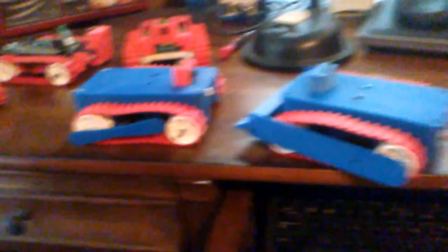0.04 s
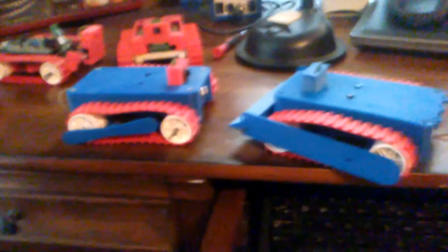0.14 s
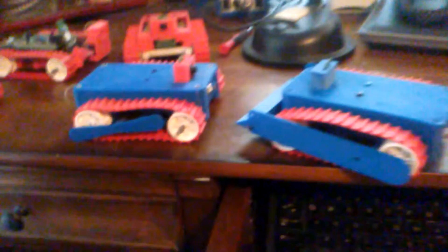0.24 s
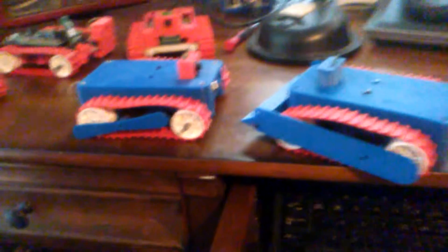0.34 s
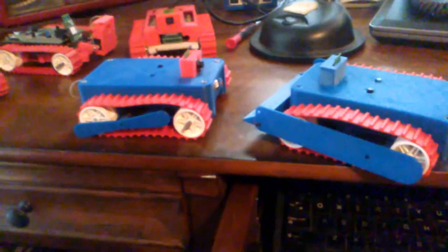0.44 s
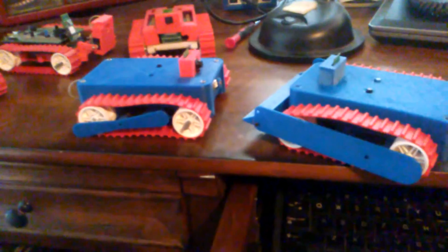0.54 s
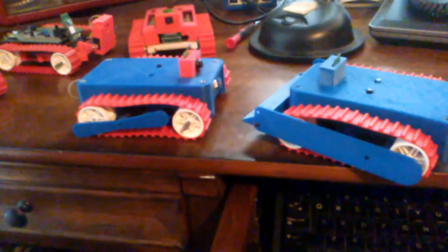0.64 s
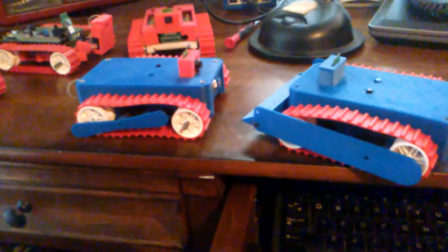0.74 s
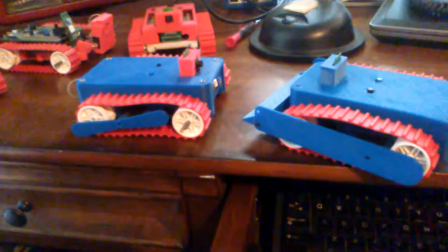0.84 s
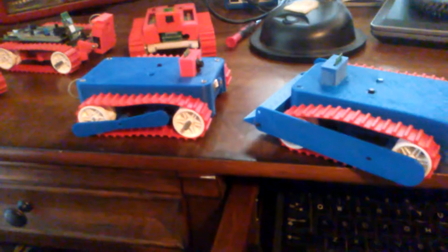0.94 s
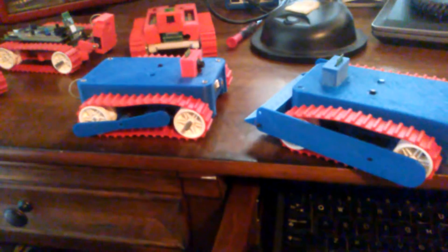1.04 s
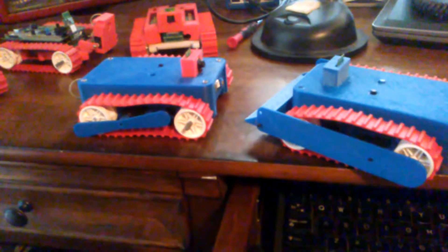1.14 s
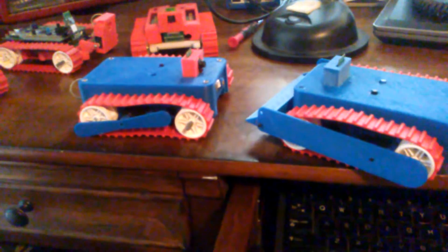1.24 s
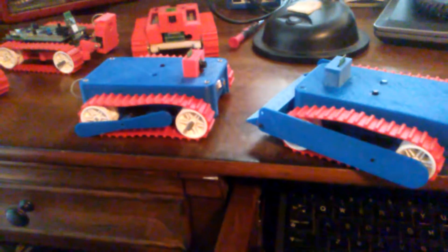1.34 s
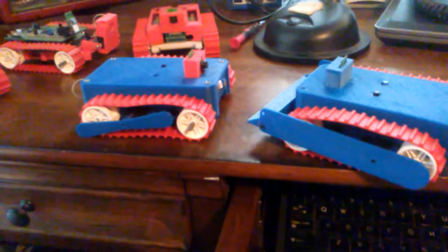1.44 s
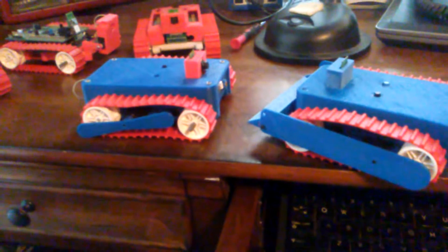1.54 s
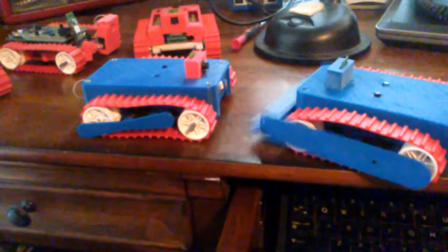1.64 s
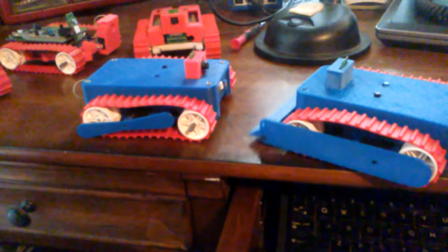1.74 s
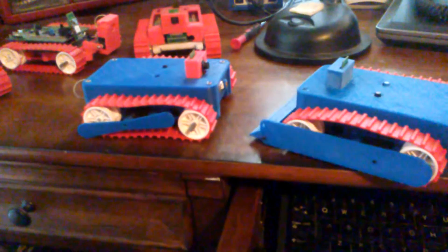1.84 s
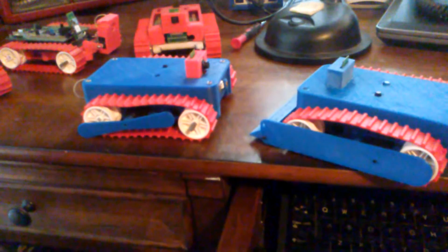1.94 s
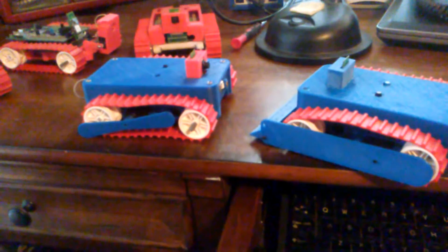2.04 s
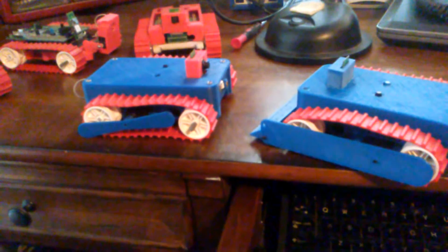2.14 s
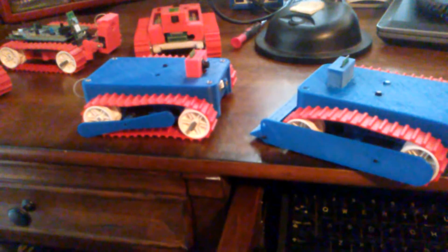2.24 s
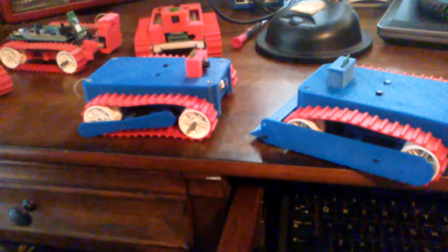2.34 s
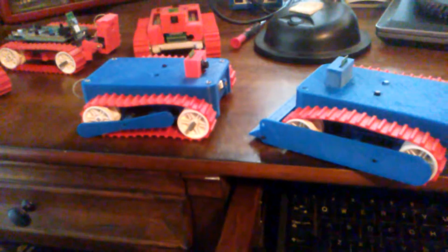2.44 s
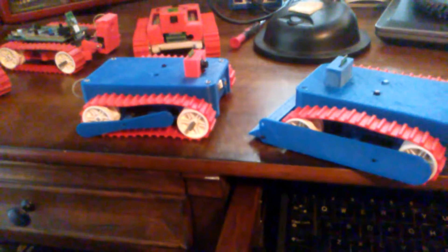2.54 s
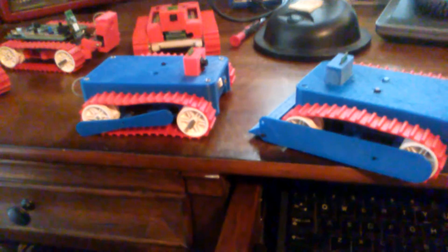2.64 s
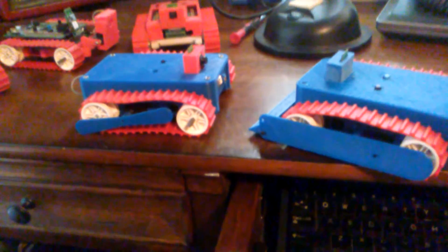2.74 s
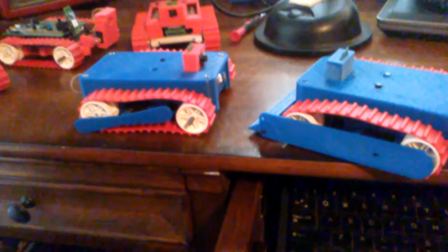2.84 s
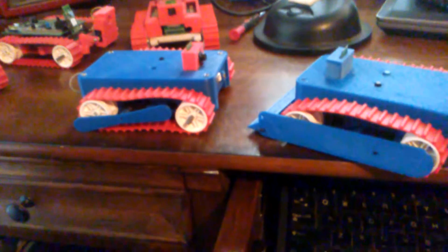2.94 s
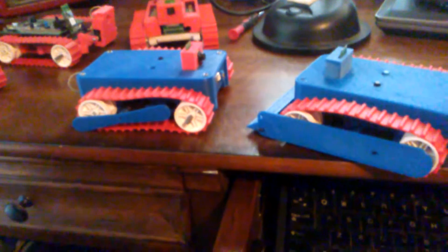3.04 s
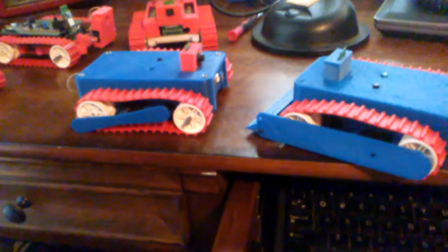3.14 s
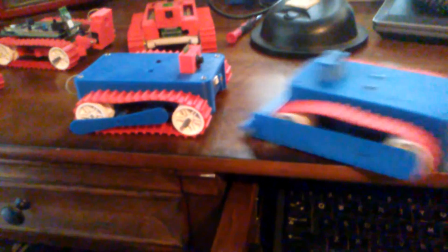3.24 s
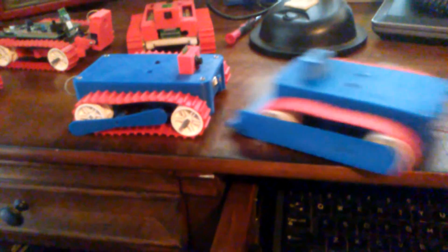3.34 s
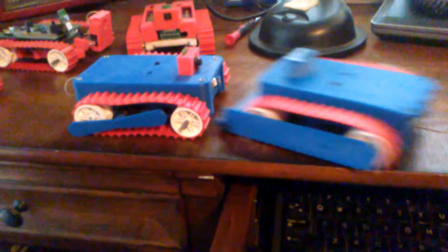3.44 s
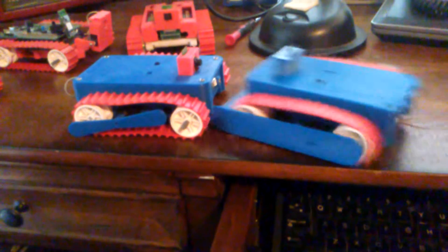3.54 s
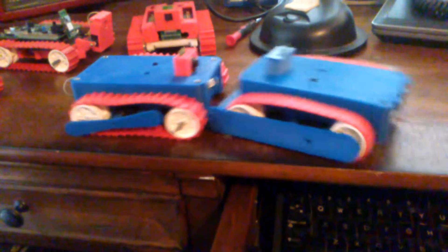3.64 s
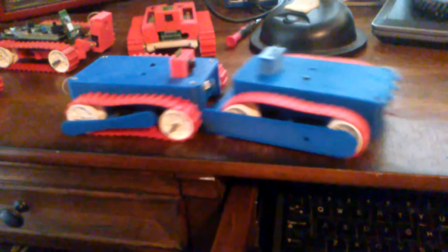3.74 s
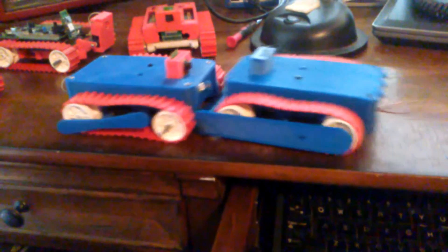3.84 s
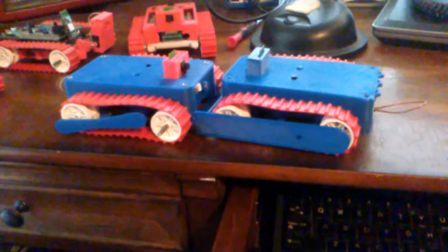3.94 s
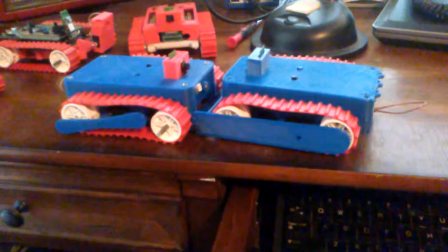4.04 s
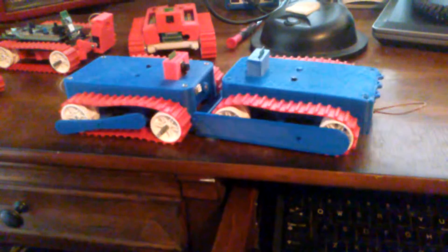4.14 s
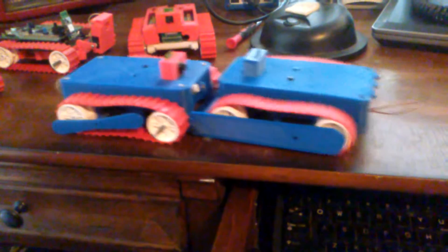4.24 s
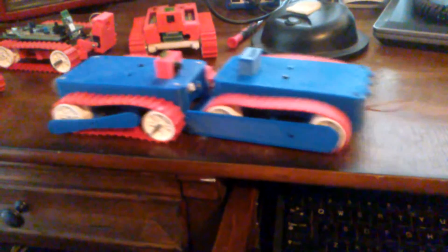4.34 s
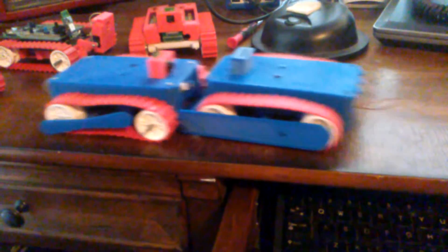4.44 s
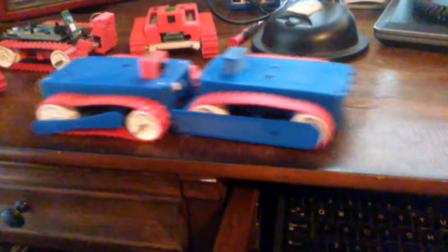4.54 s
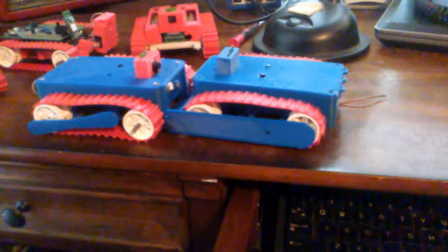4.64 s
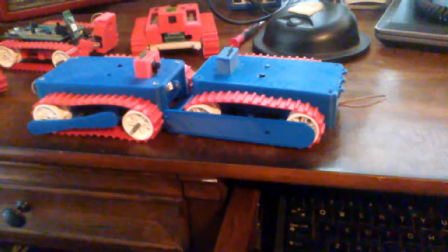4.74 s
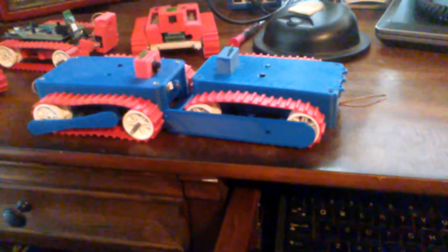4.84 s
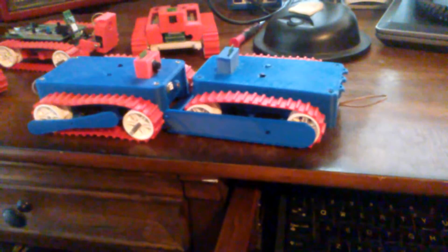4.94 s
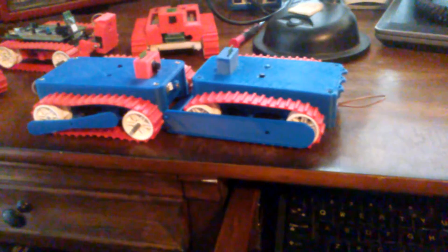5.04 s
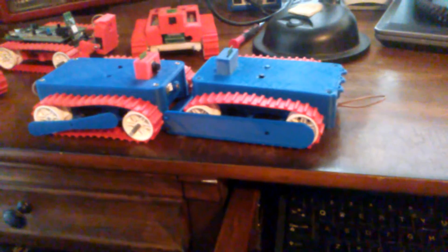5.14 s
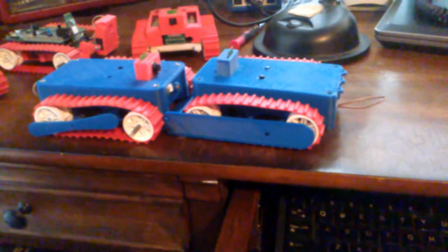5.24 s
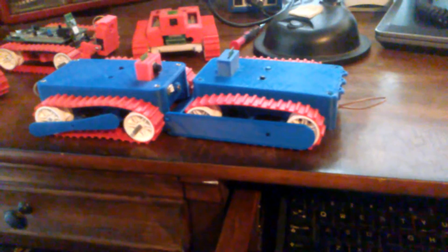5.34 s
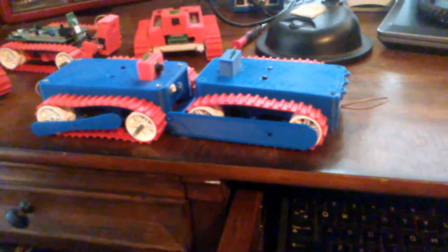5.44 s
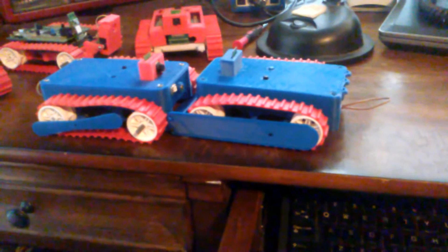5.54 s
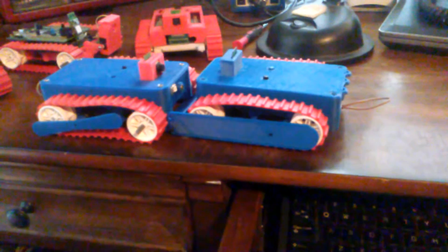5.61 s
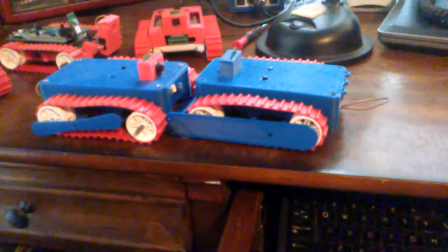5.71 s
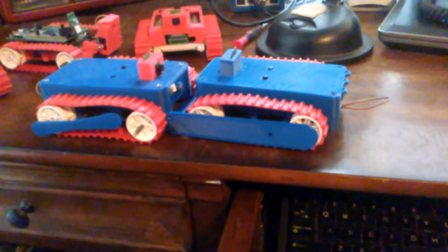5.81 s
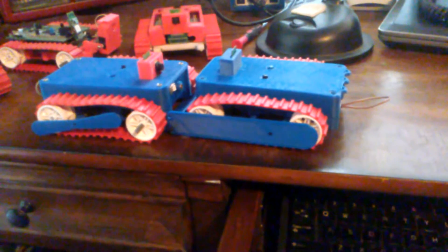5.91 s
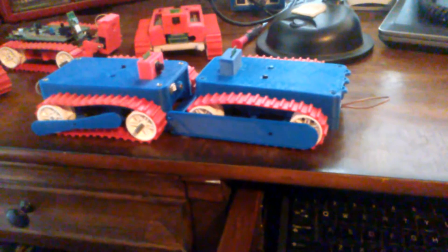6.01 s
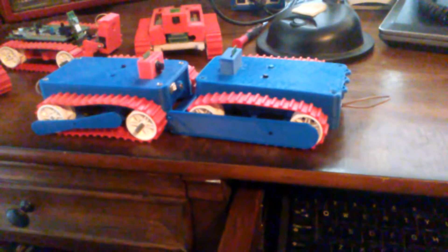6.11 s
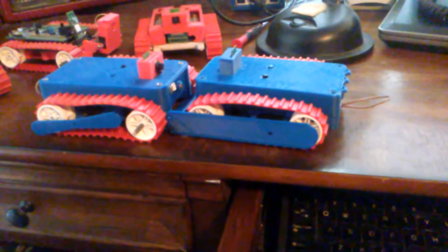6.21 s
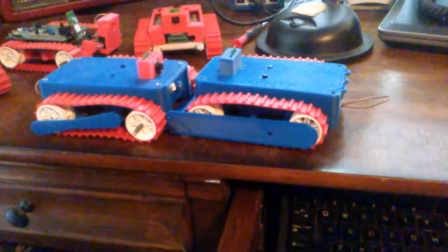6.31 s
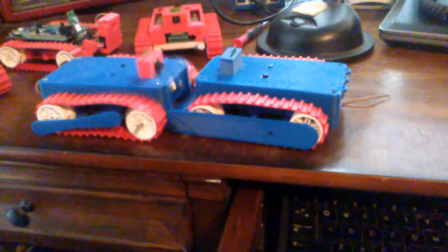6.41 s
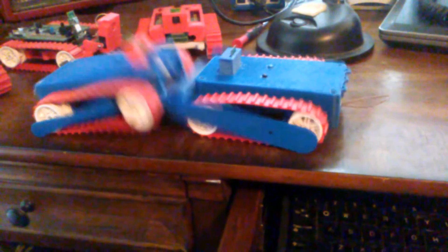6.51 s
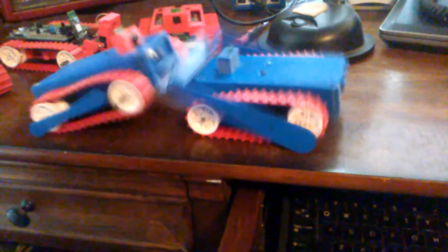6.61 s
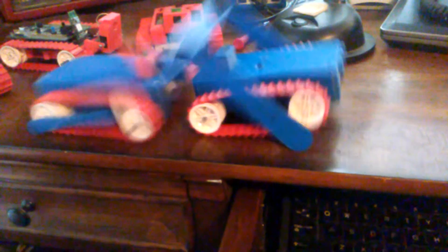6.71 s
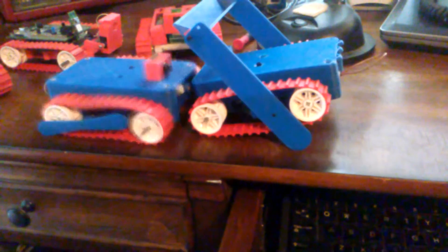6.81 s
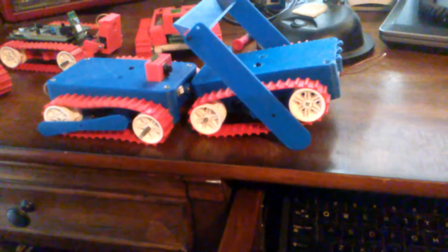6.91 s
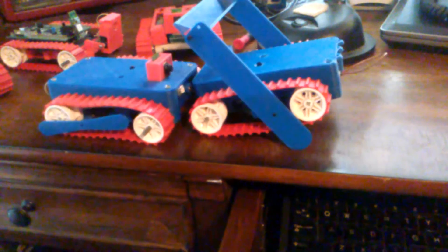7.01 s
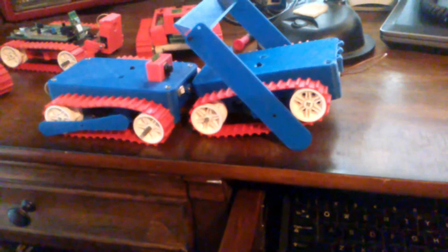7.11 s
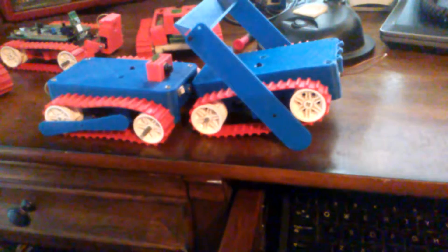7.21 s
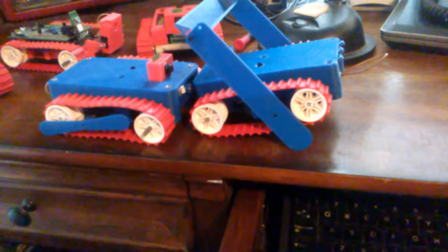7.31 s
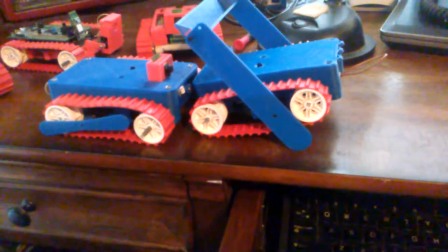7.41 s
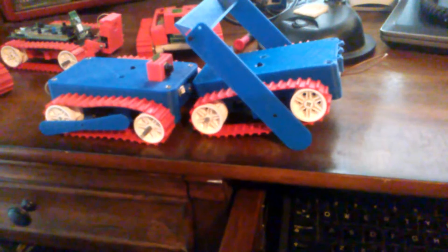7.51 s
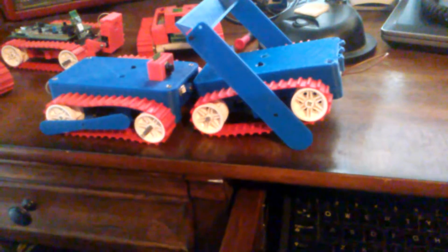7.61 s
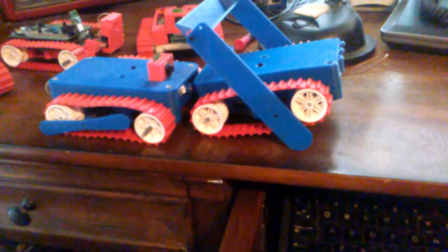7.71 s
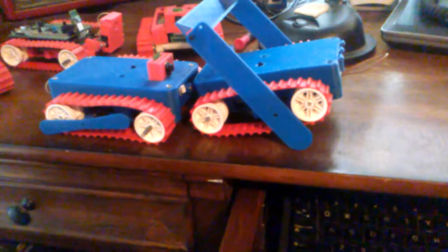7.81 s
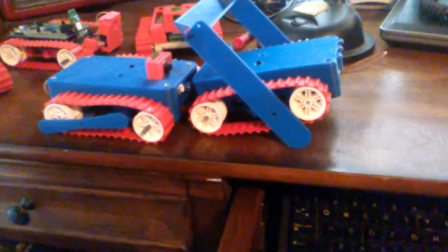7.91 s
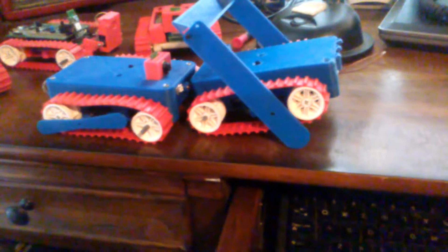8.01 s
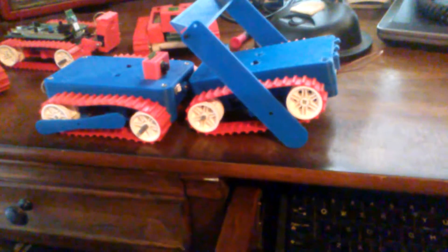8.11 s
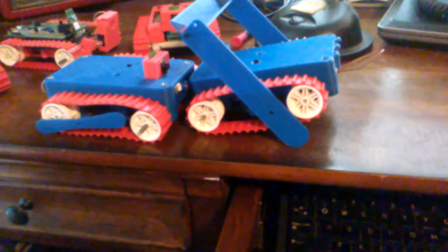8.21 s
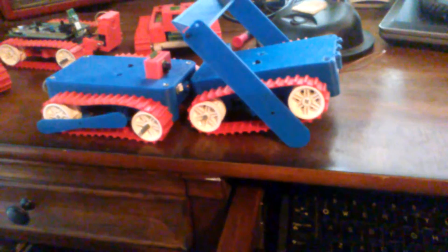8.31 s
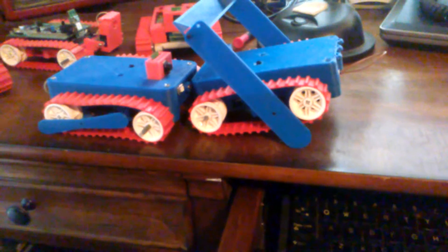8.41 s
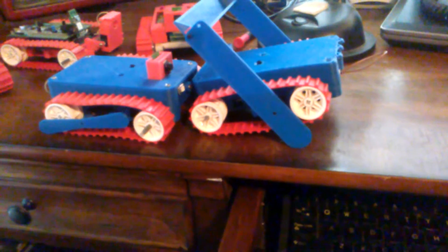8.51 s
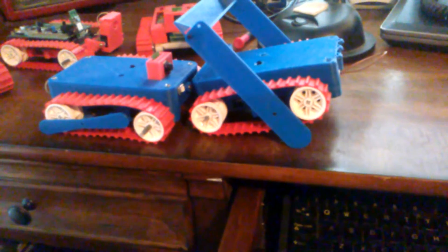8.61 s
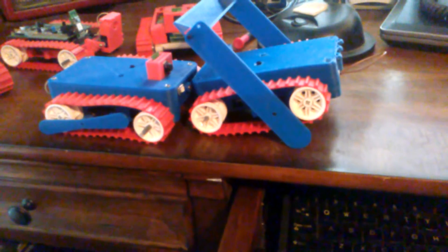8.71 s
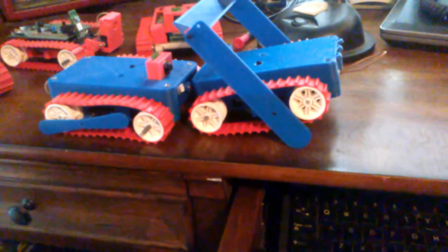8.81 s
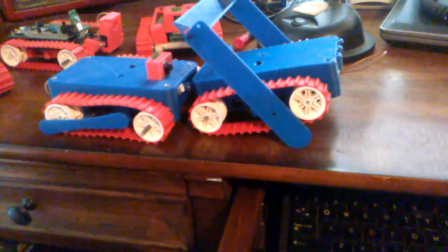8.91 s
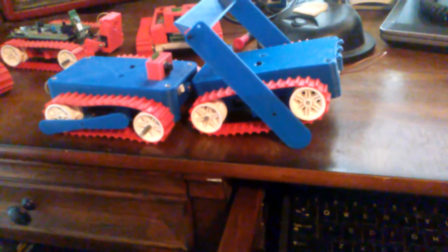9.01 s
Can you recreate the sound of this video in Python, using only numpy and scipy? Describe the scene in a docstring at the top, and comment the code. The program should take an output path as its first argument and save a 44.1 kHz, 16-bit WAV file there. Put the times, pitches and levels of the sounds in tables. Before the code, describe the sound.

Close view of two plastic tracked robots on a wooden desk in a small room, a computer fan humming softly. Mouse clicks and tiny servo ticks come first. One robot drives in two short, rattling, whining bursts, nudging the other. A faint servo buzz follows, then a sharp gear whirr flips up an arm, hulls clatter, the desk booms, and a thin buzz continues to the end.

```python
"""Small room, wooden desk: two tracked toy robots, steered by clicks of a computer mouse.
One drives forward in two bursts: shaft tones, tooth impacts and a mesh tone make its gear motors whine.
Its servo lifts an arm (whirring gears) and tips the other robot, which drops back: noise bursts, desk modes.
A stalled servo buzzes as control frames kick its gears; shaped noise and wavering tones are a computer's fan."""
import sys
import numpy as np
from scipy import signal
from scipy.fft import rfft, irfft
from scipy.io import wavfile

SR = 44100
rng = np.random.default_rng(int(sys.argv[2]) if len(sys.argv) > 2 else 0)


def file_out(sig):
    """Save sig as 16-bit WAV at sys.argv[1]."""
    # one column per channel
    cols = np.atleast_2d(sig).T
    # limit, then scale
    lim = np.clip(cols, -1, 1)
    pcm = np.round(lim * 32767).astype(np.int16)
    wavfile.write(sys.argv[1], SR, pcm)


N = 399546
TIME = np.arange(N) / SR


def from_db(db):
    """Decibels to amplitude gain."""
    return 10 ** (np.asarray(db) / 20)


def rms_one(x):
    """Scale to rms 1."""
    return x / np.sqrt(np.mean(x ** 2) + 1e-20)


def noise():
    """White noise of rms 1."""
    return rng.standard_normal(N)


def in_time(rows):
    """Interpolate (s, value) rows at every sample."""
    s, value = np.transpose(rows)
    return np.interp(TIME, s, value)


def at_hz(points, hz):
    """Interpolate (Hz, value) points on a log-frequency axis."""
    point_hz, value = np.transpose(points)
    return np.interp(np.log(hz + 1e-9), np.log(point_hz), value)


def drift(rate):
    """Random wander of rms 1, faster at higher rate: two-pole noise, one value per 40 samples."""
    pole = np.exp(-80 * np.pi * rate / SR)
    settle = 2000
    slow = signal.lfilter([1], [1, -2 * pole, pole ** 2], rng.standard_normal(N // 40 + settle + 2))
    slow = rms_one(slow[settle:])
    return np.interp(np.arange(N) / 40, np.arange(len(slow)), slow)


def body(x, colour, rings=(), size=8192):
    """Minimum-phase filter of unit power gain: broad colour (Hz, dB) plus resonances (Hz, width Hz, lift dB)."""
    hz = np.arange(size // 2 + 1) * SR / size
    db = at_hz(colour, hz)
    for ring_hz, width_hz, lift_db in rings:
        db = db + lift_db / (1 + (2 * (hz - ring_hz) / width_hz) ** 2)
    # folding the cepstrum makes the response causal
    cepstrum = irfft(np.log(from_db(db)))
    cepstrum[1:size // 2] *= 2
    cepstrum[size // 2 + 1:] = 0
    response = irfft(np.exp(rfft(cepstrum)))
    return signal.oaconvolve(x, response / np.linalg.norm(response))[:N]


def impulses(rows):
    """One impulse for each (s, dB)."""
    out = np.zeros(N)
    for s, db in rows:
        out[int(s * SR)] += from_db(db)
    return out


def decaying(hits, decay_s):
    """Each hit becomes an exponential decay."""
    return signal.lfilter([1], [1, -np.exp(-1 / (decay_s * SR))], hits)


def highpass(x, order, hz):
    """Butterworth high-pass."""
    return signal.sosfilt(signal.butter(order, hz, "high", fs=SR, output="sos"), x)


def ramp(start_s, length_s):
    """Rise from 0 to 1, then stay."""
    return np.clip((TIME - start_s) / length_s, 0, 1)


def chatter(decay_s, size=512):
    """Brief rough contact of two hard parts: decaying noise with a flattened spectrum."""
    spectrum = rfft(rng.standard_normal(size) * np.exp(-np.arange(size) / SR / decay_s))
    flat = irfft(spectrum / np.abs(spectrum))
    return np.roll(flat, size // 16)[:size // 2]


def tooth_impacts(turns, scatter_db, uneven_db, count=12):
    """Each pinion tooth lands with its own strength; backlash scatters the strength of every blow."""
    tooth = np.floor(turns * count).astype(int)
    lands = np.diff(tooth, prepend=0) > 0
    tooth_db = uneven_db * rng.standard_normal(count)
    strength_db = tooth_db[tooth % count] + scatter_db * noise()
    return rms_one(lands * from_db(strength_db))


# Colour of room air and computer fan. Each row: frequency in Hz, relative level in dB per Hz.
AIR_COLOUR = [(20, 0.5), (55, -0.5), (83, -11), (120, -7), (165, -13), (300, -16), (600, -17), (850, -22.5),
              (1400, -27), (2200, -29), (4500, -35.5), (8000, -40.5), (12500, -39.5), (15700, -38.5)]
# Wavering fan tones. Each row: centre frequency in Hz, level in dB before the waver.
HUM_TONES = [(119.5, -48.5), (314, -61), (377, -61), (630, -62), (947, -63)]
AIR_DB = -43


def background(waver_hz=2.093, waver_db=2.0):
    """Fan: broadband air noise with faint hiss, plus tones wavering in pitch and level."""
    air = from_db(AIR_DB) * body(noise(), AIR_COLOUR, [(9730, 2200, 7.5)])
    hum = 0
    for hz, db in HUM_TONES:
        level = from_db(db + waver_db * drift(4.3))
        cycles = np.cumsum(hz + waver_hz * drift(6.0)) / SR
        hum = hum + level * np.sin(2 * np.pi * cycles)
    return air + np.sqrt(2) * hum


# Mouse button snaps. Each row: time in seconds, relative level in dB.
CLICKS = [(1.451, -19), (1.7896, -13), (3.0632, -16.5), (4.085, -18), (6.124, -16), (6.952, -11),
          (9.0298, -16)]
# Colour of the button. Each row: frequency in Hz, relative level in dB per Hz.
MOUSE_COLOUR = [(800, -50), (2600, -16), (3700, -5.5), (4600, -1), (6200, -11), (8000, 3), (11500, -4),
                (15700, -16)]
# Resonances of the button. Each row: frequency in Hz, width in Hz, lift in dB.
MOUSE_RINGS = [(7790, 270, 10.2), (9460, 370, 2.5), (11500, 230, 3.7)]


def mouse(level_db=-5, decay_s=0.0016, echo_s=0.0029, echo_db=-11):
    """The button's spring snaps as a decaying noise burst; a nearby surface throws it back."""
    echoes = [(s + echo_s, db + echo_db) for s, db in CLICKS]
    force = decaying(impulses(CLICKS) + impulses(echoes), decay_s)
    return from_db(level_db) * body(force * noise(), MOUSE_COLOUR, MOUSE_RINGS)


# Servo twitches. Each row: start in seconds, length in seconds, effort in dB.
TWITCHES = [(1.662, 0.0094, -36), (1.68, 0.038, -33), (1.762, .007, -34), (1.82, .007, -42.5),
            (6.34, .008, -43), (6.362, 0.0088, -35), (6.386, 0.038, -22.5)]
# Servo heaving the other robot up. Each row: time in seconds, effort in dB.
LIFT = [(6.46, -31), (6.488, -19), (6.534, -18.5), (6.564, -27), (6.67, -8.5), (6.7, -11.5), (6.708, -9.5),
        (6.764, -27.5), (6.79, -23)]
# Colour of the servo gears in motion. Each row: frequency in Hz, relative level in dB per Hz.
SERVO_GEARS = [(300, -19), (900, -29), (1400, -25), (3500, -16.5), (5000, -11.5), (6200, -4), (7600, 1),
               (9800, 3.5), (11500, -5.5), (15700, -15)]
# Colour of the servo case and buzz. Each row: frequency in Hz, relative level in dB per Hz.
BUZZ_COLOUR = [(300, -6), (900, 1), (1400, 0), (3500, -0.5), (5000, -0.5), (7500, 1.5), (9800, 1),
               (11500, -4.5), (15700, -8)]
SERVO_ATTACK_S, SERVO_RELEASE_S = 0.0051, 0.0056
SERVO_UNEVEN_DB = 2.5  # spread of strength among the teeth


def burst(start_s, end_s):
    """The servo's motor starts quickly, holds, and dies away."""
    dying = np.exp(-np.clip((TIME - end_s) / SERVO_RELEASE_S, 0, 20))
    return ramp(start_s, SERVO_ATTACK_S) * dying


def servo_swing(motor_hz=330, rub=1.0, lumpy_db=1.5, gears_db=-1, case_db=-2, case_top_db=-33):
    """Tiny gears whirr as the arm moves: their sound follows effort, the case ring is capped."""
    turns = np.cumsum(motor_hz * (1 + .08 * drift(8))) / SR
    teeth = tooth_impacts(turns, scatter_db=1.5, uneven_db=SERVO_UNEVEN_DB) * np.sign(drift(900))
    contact = rms_one((teeth + rub * noise()) * from_db(lumpy_db * drift(100)))
    effort = from_db(in_time(LIFT)) * burst(LIFT[0][0], LIFT[-1][0])
    for s, length_s, db in TWITCHES:
        effort = effort + from_db(db) * burst(s, s + length_s)
    gears = effort * from_db(gears_db) * body(contact, SERVO_GEARS)
    case = body(noise(), BUZZ_COLOUR, [(1340, 72, 15.7), (2700, 260, 6), (5010, 970, 14.5)])
    case_level = np.minimum(effort * from_db(case_db), from_db(case_top_db))
    return gears + case_level * case


# Servo holding the arm. Each row: start in seconds, end in seconds.
HOLDS = [(.195, .235), (4.787, 5.215), (5.235, 5.595), (5.635, 5.695), (5.735, 5.775), (5.835, 5.867),
         (5.895, 6.035), (6.055, 6.335), (6.99, 9.1)]
# Resonances, arm down. Each row: frequency in Hz, width in Hz, lift in dB.
ARM_DOWN_RINGS = [(1340, 120, 17), (2050, 320, 8.9), (3500, 270, 5.6), (4710, 320, 10), (6730, 320, 3.8)]
# Resonances, arm raised. Each row: frequency in Hz, width in Hz, lift in dB.
ARM_UP_RINGS = [(1347, 103, 23.8), (2570, 49, 17), (4430, 78, 4.2), (4590, 97, 12.2), (4997, 153, 18),
                (5640, 230, 9), (8730, 130, 9.3), (9860, 140, 8.9)]
FRAME_HZ, FIRST_FRAME_S = 50.011, .0024  # control pulses
HOLD_DOWN_DB, HOLD_UP_DB = -48.5, -47.5
LOOSE = .45  # weight of the part of each kick that differs from the last


def servo_hold(release_s=.0033, release_db=-5, scatter_db=0.3):
    """Each control frame kicks the stalled gears against their backlash; they fall back a moment later."""
    frames_s = np.arange(FIRST_FRAME_S, TIME[-1] - release_s, 1 / FRAME_HZ)
    strength_db = scatter_db * rng.standard_normal(len(frames_s))
    kicks = impulses(zip(frames_s, strength_db))
    kicks = kicks + impulses(zip(frames_s + release_s, strength_db + release_db))
    contact = chatter(decay_s=0.0024)
    alike = signal.oaconvolve(kicks, contact)[:N]
    fresh = signal.oaconvolve(kicks, np.abs(contact))[:N] * noise()
    holding = sum((TIME > start) & (TIME < end) for start, end in HOLDS)
    buzz = rms_one(alike + LOOSE * fresh) * holding
    raised = TIME > LIFT[-1][0]
    down = from_db(HOLD_DOWN_DB) * body(buzz * ~raised, BUZZ_COLOUR, ARM_DOWN_RINGS)
    up = from_db(HOLD_UP_DB) * body(buzz * raised, BUZZ_COLOUR, ARM_UP_RINGS)
    return down + up


# Plastic hulls knocking. Each row: time in seconds, relative level in dB.
KNOCKS = [(3.598, -20), (6.431, -34), (6.502, -18), (6.59, -12), (6.594, -10.5), (6.615, -8), (6.631, -17),
          (6.711, -8.5), (6.724, -18), (6.777, -13.5), (6.791, -17)]
# Colour of the hulls. Each row: frequency in Hz, relative level in dB per Hz.
HULL_COLOUR = [(80, -7), (250, -8), (600, 0), (1100, -3), (2200, -4.5), (3500, -9.5), (5200, -5.5),
               (12000, -32)]
# Resonances of the hulls. Each row: frequency in Hz, width in Hz, lift in dB.
HULL_RINGS = [(1040, 150, 11.3), (1210, 53, 2.3), (1960, 130, 4.7)]
# Blows on the desk top. Each row: time in seconds, relative level in dB.
THUMPS = [(6.5, -33), (6.594, -29), (6.622, -21.5), (6.711, -7), (6.723, -10), (6.739, -10), (6.776, -9.5),
          (6.803, -11.5)]
# Modes of the desk top. Each row: frequency in Hz, relative level in dB, t60 in seconds.
DESK_MODES = [(91.7, -4.5, 0.57), (144, -6, 0.18), (159.8, -4.5, 0.33), (195.2, -1, 0.28),
              (247, -11, 0.096), (280.5, -9, 0.28), (380.4, -13.5, 0.132)]


def tumble(knock_db=-2, clatter_s=0.0071, desk_db=-1, soft_hz=420):
    """Hulls clatter as decaying noise; the dropped robot sets the desk's modes booming."""
    # 1e-18 keeps the filters from decaying to zero
    force = decaying(impulses(KNOCKS) + 1e-18, clatter_s)
    out = from_db(knock_db) * body(force * noise(), HULL_COLOUR, HULL_RINGS)
    # the treads cushion each blow
    cushion = signal.butter(2, soft_hz, fs=SR, output="sos")
    blows = signal.sosfilt(cushion, impulses(THUMPS) + 1e-18)
    for k, (hz, db, t60_s) in enumerate(DESK_MODES):
        r = from_db(-60 / (t60_s * SR))
        w = 2 * np.pi * hz / SR
        mode = signal.lfilter([0, np.sin(w)], [1, -2 * r * np.cos(w), r * r], blows)
        out = out + (-1) ** k * from_db(db + desk_db) * mode
    return out


# Runs of the drive. Each row: power on in seconds, load taken up in seconds, power off in seconds,
# top speed before sag in turns per s, sag in turns per s each s, spin-up time constant in s,
# rattle gain in dB, whine gain in dB, tread rumble gain in dB (gains at full speed, no load).
RUNS = [(3.217, 3.785, 3.897, 483, 108, .049, -9.5, -22, -48),
        (4.207, 4.384, 4.639, 413, 35, .06, -9.0, -16.5, -53)]
BRAKE_TURNS_PER_S2 = 4900  # slowing once the power is off
RATTLE_FULL_TURNS_PER_S, RATTLE_POWER = 211, 1.43
WHINE_FULL_TURNS_PER_S, WHINE_POWER = 428, 5.0
LOAD_S = 0.018  # time to take up the load of pushing the other robot
LOAD_WHINE_DB, LOAD_MESH_DB, LOAD_RUMBLE_DB = -8, 3.5, 9.5  # changes under that load


def motion():
    """Motors spin up, sag and brake: shaft speed, load, and rattle, whine and rumble gains that follow."""
    speed, load, rattle, whine, rumble = np.zeros((5, N))
    for on, loaded, off, top, sag, spin_up_s, rattle_db, whine_db, rumble_db in RUNS:
        powered_s = np.clip(TIME - on, 0, off - on)
        driven = (top - sag * powered_s) * (1 - np.exp(-powered_s / spin_up_s))
        braking = BRAKE_TURNS_PER_S2 * np.maximum(TIME - off, 0)
        rate = np.maximum(driven - braking, 0)
        pushing = ramp(loaded, LOAD_S) * (rate > 0)
        rolling = np.minimum(rate / RATTLE_FULL_TURNS_PER_S, 1) ** RATTLE_POWER
        whining = np.minimum(rate / WHINE_FULL_TURNS_PER_S, 1) ** WHINE_POWER
        speed = speed + rate
        load = load + pushing * (1 - ramp(off, LOAD_S))
        rattle = rattle + from_db(rattle_db) * rolling
        whine = whine + from_db(whine_db + LOAD_WHINE_DB * pushing) * whining
        rumble = rumble + from_db(rumble_db + LOAD_RUMBLE_DB * pushing) * rolling
    return speed, load, rattle, whine, rumble


def tracks(desk_hz=88, width_hz=40):
    """Rolling treads shake the lowest mode of the desk top: low noise with one resonance."""
    colour = [(40, -2.0), (100, -6.0), (400, -16), (2000, -50)]
    *_, rumble_gain = motion()
    return rumble_gain * body(noise(), colour, [(desk_hz, width_hz, 14)])


# Partials of a three-pole motor. Each row: multiple of shaft rate, relative level in dB.
MOTOR_ORDERS = [(1, -24), (2, -30), (3, 0), (5, -7), (7, -18), (11, -10), (12, -4), (13, -10)]
# Colour of the gearbox. Each row: frequency in Hz, relative level in dB per Hz.
GEARBOX_COLOUR = [(60, -25), (110, -24), (200, -30), (750, -28), (1100, -15.5), (1550, -19), (2400, -13.5),
                  (4200, -11.5), (5200, -8), (6500, -9), (8000, -5.5), (9600, 2), (13000, -7.5),
                  (15700, -15.5)]
# Resonances of the gearbox. Each row: frequency in Hz, width in Hz, lift in dB.
GEARBOX_RINGS = [(1314, 320, 9.5), (1733, 82, 10.5), (2210, 130, 3.5), (2480, 116, 6), (2986, 46, 6),
                 (3695, 160, 10), (5000, 44, 7.5), (5740, 180, 5), (9760, 680, 8), (10580, 270, 7)]
CAN_HZ, CAN_DB = 2900, -17  # ring of the motor can


def drive(wobble=.002, slower=0.93, second_db=-12, rub=2.23, flutter_db=2.0, lumpy_db=0.5,
          mesh_db=-11, play_turns=0.22, mesh_teeth=24, mesh_hz=5300):
    """Two motors, one per track: tones of the shaft, and teeth meshing and rattling in the gearbox."""
    speed, load, rattle_gain, whine_gain, _ = motion()
    teeth, whine, mesh, can = 0, 0, 0, 0
    for ratio, motor_db in ((1, 0), (slower, second_db)):
        turns = np.cumsum(speed * ratio * (1 + wobble * drift(25))) / SR
        impacts = tooth_impacts(turns, scatter_db=5.0, uneven_db=3.0)
        teeth = teeth + impacts * np.sign(drift(900))
        # play between the teeth smears the shrill mesh tone
        mesh_cycles = mesh_teeth * turns + play_turns * drift(150)
        mesh = mesh + from_db(motor_db + flutter_db * drift(60)) * np.sin(2 * np.pi * mesh_cycles)
        for order, db in MOTOR_ORDERS:
            level = from_db(db + motor_db + flutter_db * drift(30))
            whine = whine + level * np.sin(2 * np.pi * order * turns)
        can = can + from_db(motor_db) * np.sin(2 * np.pi * 7 * turns)
    # the can sings only while the seventh partial meets its sharp resonance
    can = signal.lfilter(*signal.iirpeak(CAN_HZ, 90, fs=SR), can)
    # the small gears radiate little at low speed
    mesh = highpass(mesh, 8, mesh_hz)
    turning = np.mean(speed > 0)  # share of the time
    contact = (teeth * np.sqrt(turning) + rub * noise()) / np.sqrt(2 + rub ** 2)
    rattle = body(contact * from_db(lumpy_db * drift(90)), GEARBOX_COLOUR, GEARBOX_RINGS)
    mesh_gain = from_db(mesh_db + LOAD_MESH_DB * load)
    gearbox = rattle + mesh_gain * mesh + from_db(CAN_DB) * can
    return rattle_gain * gearbox + whine_gain * whine


# Room decay. Each row: frequency in Hz, t60 in seconds.
ROOM_T60 = [(100, 0.52), (1000, 0.6), (4000, 0.55), (8000, 0.45), (16000, 0.37)]


def room(x, size=26000):
    """Diffuse reflections of unit power: noise bands, each dying at its own rate."""
    t = TIME[:size]
    tail = 0
    edges_hz = np.geomspace(250, 16000, 7)
    for low, high in zip(edges_hz, edges_hz[1:]):
        band_filter = signal.butter(2, [low, high], "band", fs=SR, output="sos")
        band = signal.sosfilt(band_filter, rng.standard_normal(size))
        tail = tail + band * from_db(-60 * t / at_hz(ROOM_T60, np.sqrt(low * high)))
    tail = tail * np.minimum(t / 0.0025, 1)
    return signal.oaconvolve(x, tail / np.linalg.norm(tail))[:N]


def scene(direct_db=-0.96, room_db=-9.5, side_db=-14, side_hz=7000):
    """All in the middle; high-passed drive sound times random wander is added, opposite in sign left and right."""
    motors = drive()
    near = mouse() + servo_swing() + servo_hold() + tumble() + tracks() + motors
    mid = background() + from_db(direct_db) * near + from_db(room_db) * room(near)
    side = from_db(side_db) * highpass(motors, 4, side_hz) * drift(600)
    return np.array([mid + side, mid - side])


CEILING, CUTOFF_HZ = .98, 15800


def record(dry):
    """Overload rounds the highest peaks; a steep low-pass cuts the top."""
    rounded = dry / (1 + (dry / CEILING) ** 8) ** (1 / 8)
    top_cut = signal.ellip(12, .1, 80, CUTOFF_HZ, fs=SR, output="sos")
    return signal.sosfilt(top_cut, rounded)


dry = scene()
out = record(dry)
file_out(out)
```